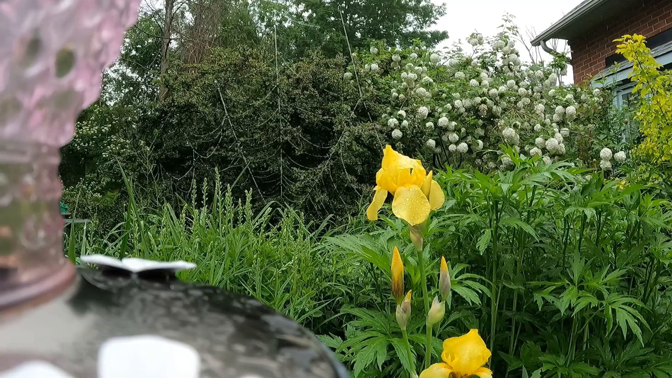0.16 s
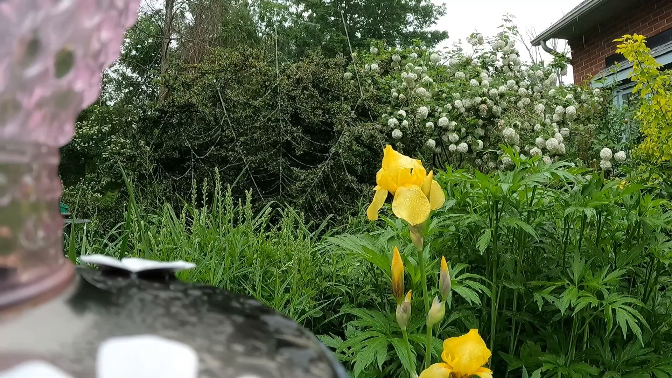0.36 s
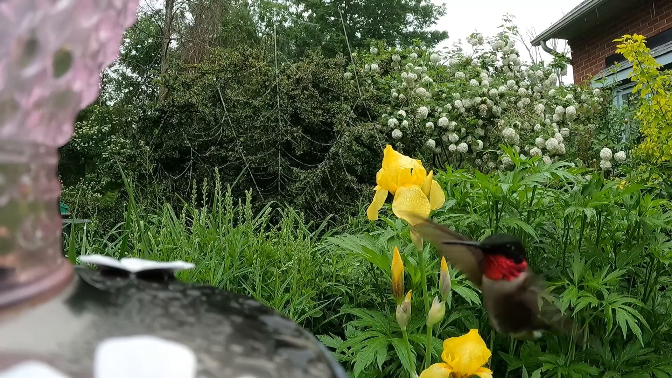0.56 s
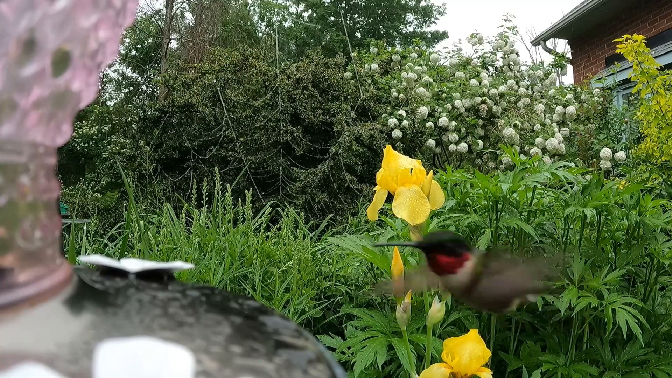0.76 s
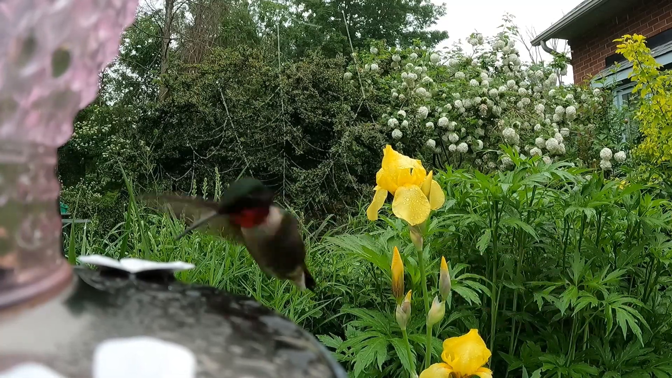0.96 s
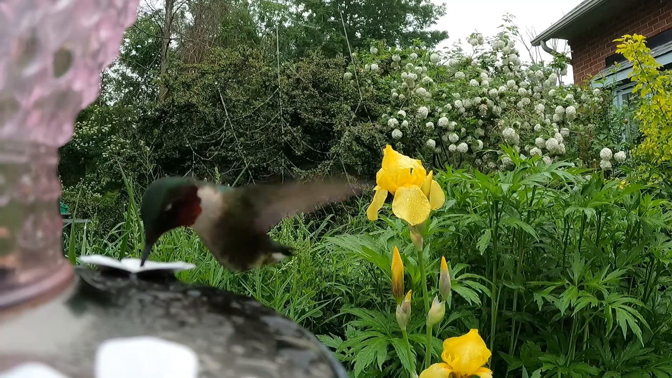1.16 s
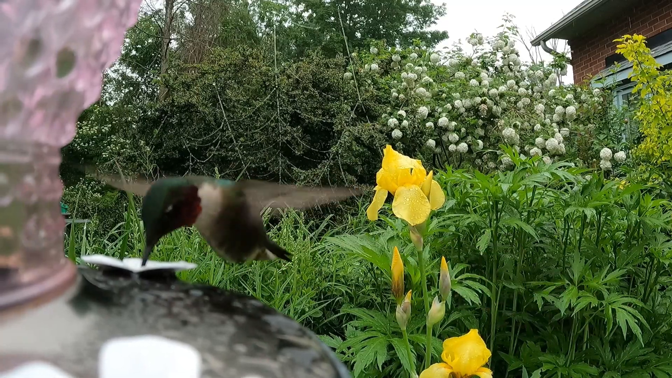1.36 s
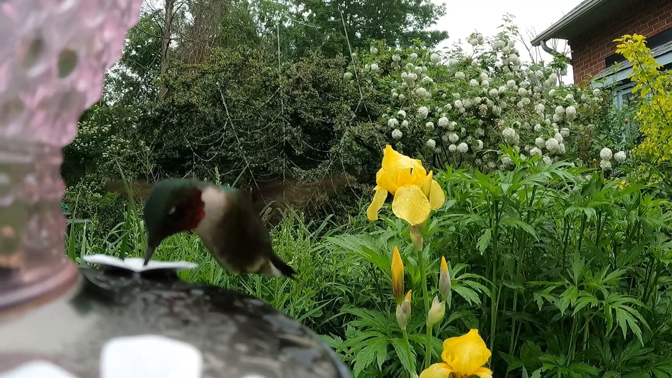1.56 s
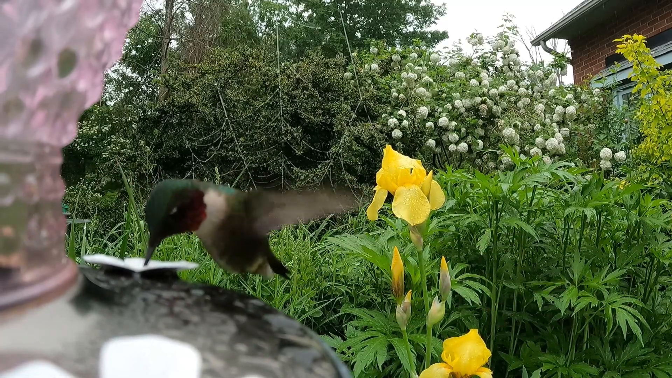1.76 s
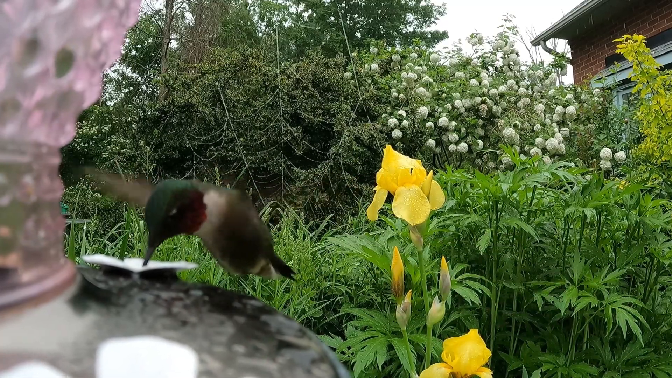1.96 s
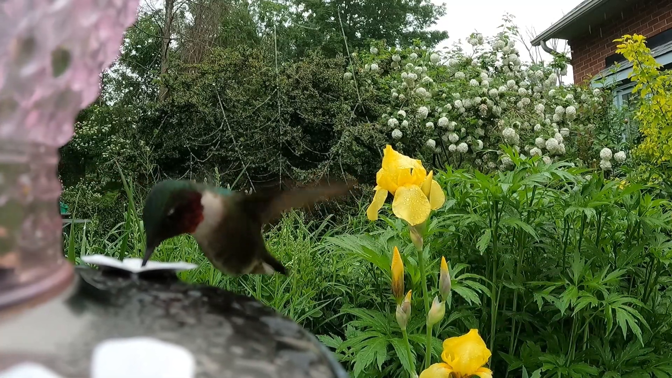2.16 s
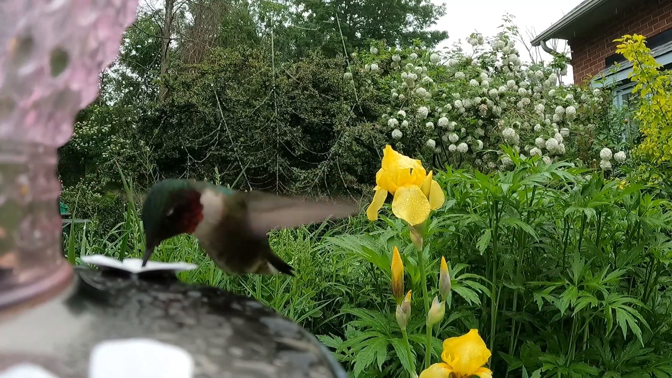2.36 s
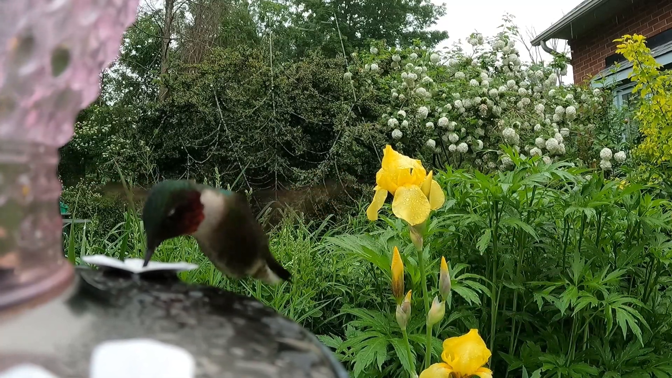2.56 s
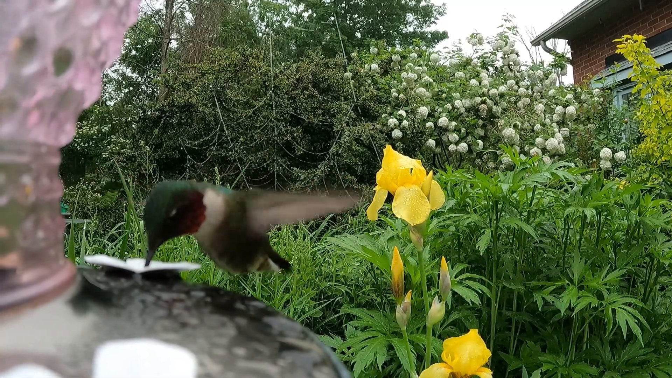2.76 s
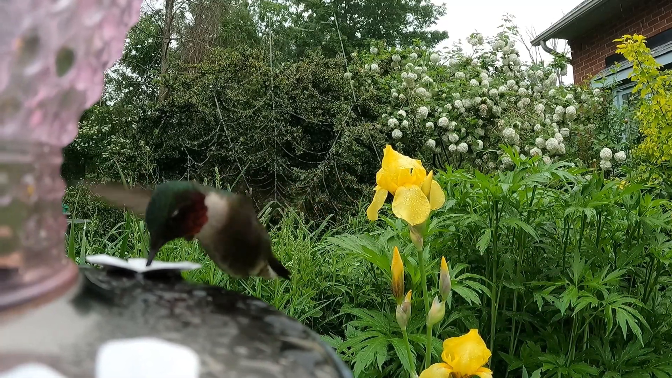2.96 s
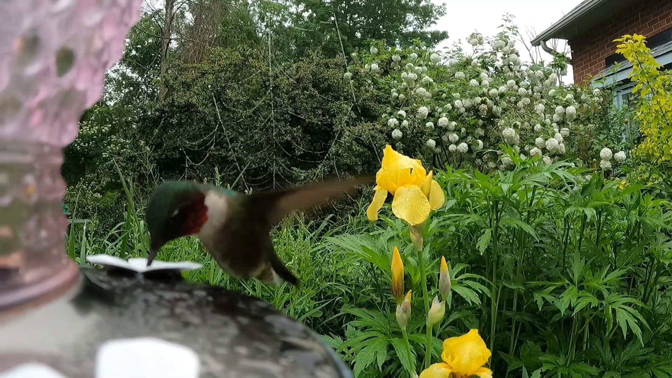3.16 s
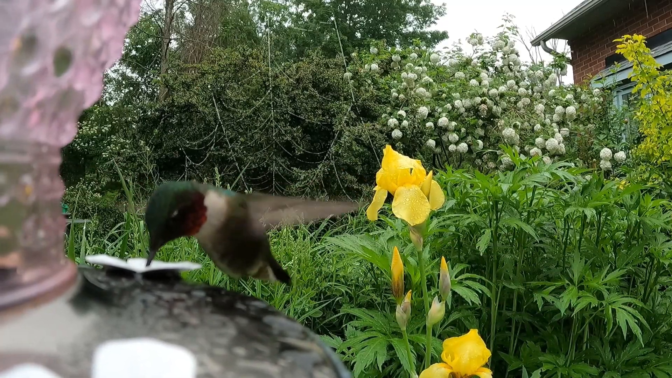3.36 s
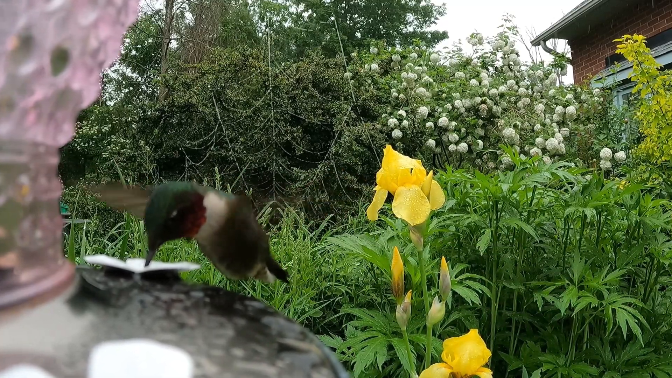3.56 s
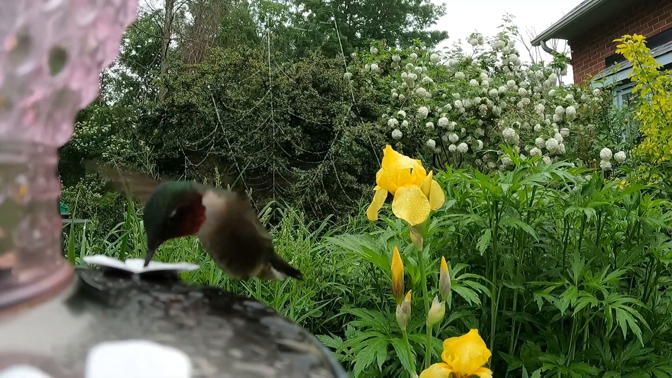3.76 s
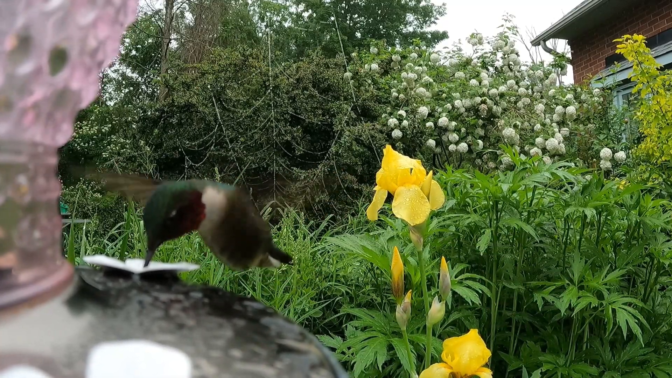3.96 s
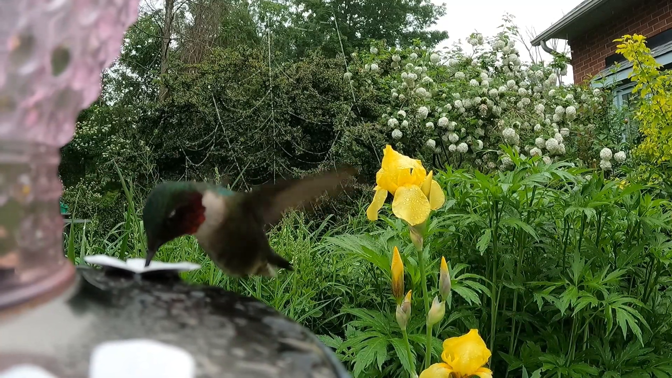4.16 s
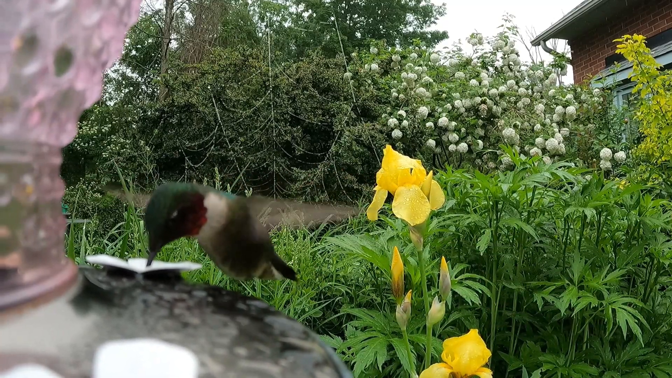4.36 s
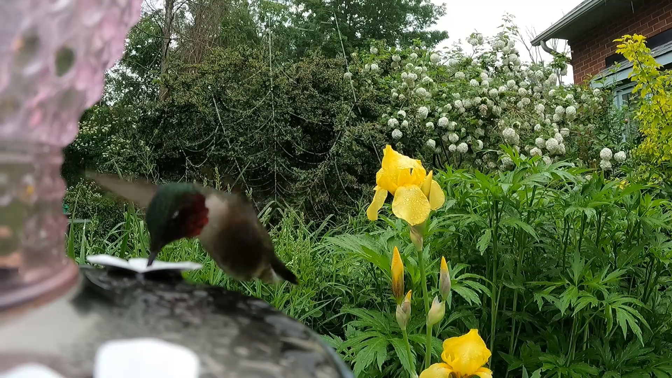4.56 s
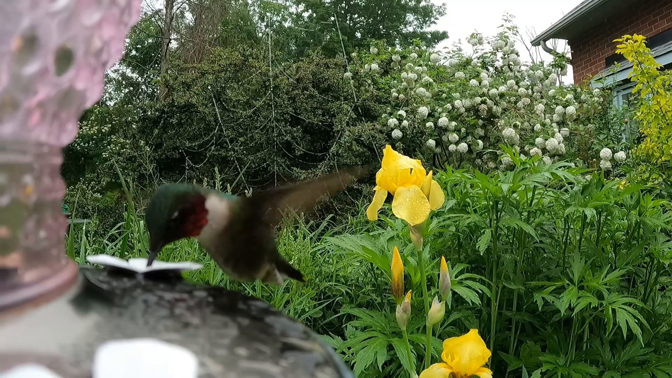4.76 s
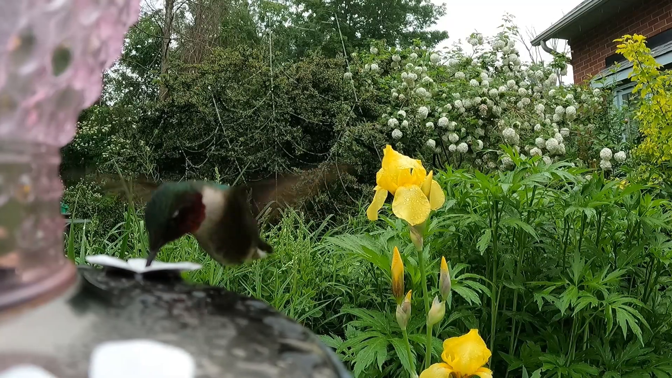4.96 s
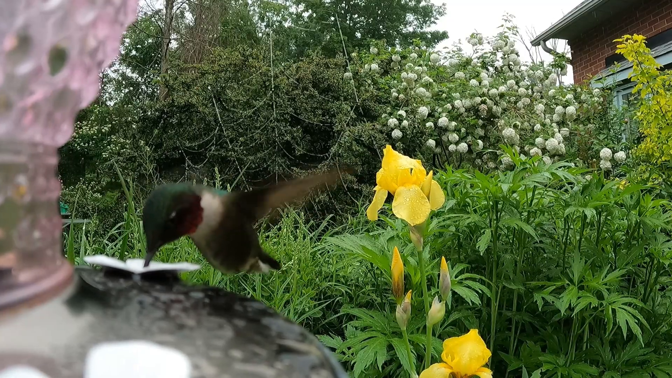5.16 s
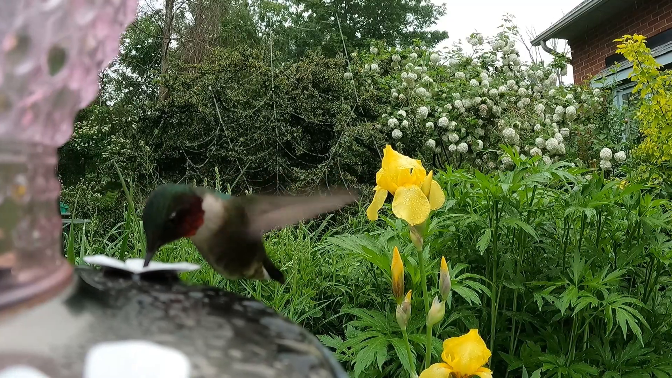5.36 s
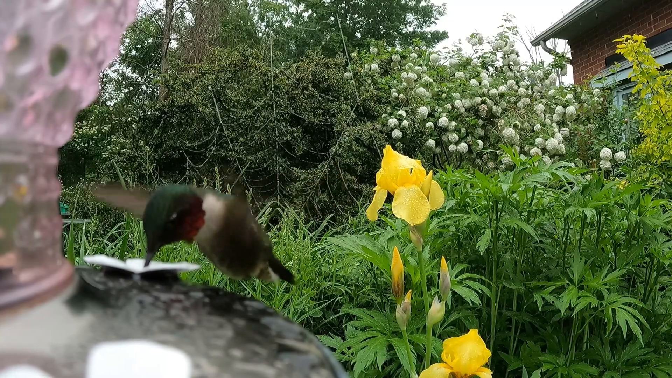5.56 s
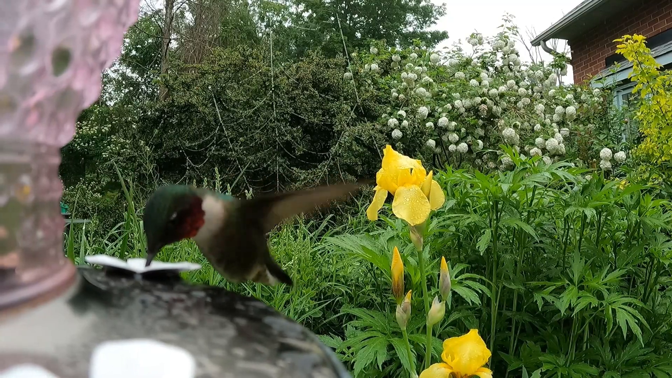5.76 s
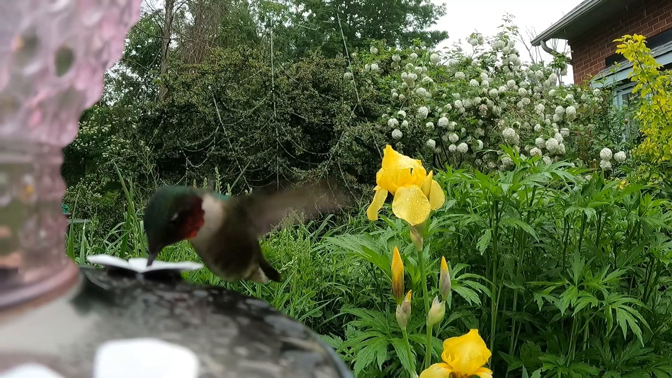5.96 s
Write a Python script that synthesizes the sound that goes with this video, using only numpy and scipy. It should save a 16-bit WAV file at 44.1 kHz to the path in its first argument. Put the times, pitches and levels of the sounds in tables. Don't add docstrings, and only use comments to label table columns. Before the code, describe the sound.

Close stereo pickup of hovering wings, slightly to the right. The first second is uneven: the hum swells, thins and brightens between gusty puffs and small clicks. Then the bird holds still and the deep, buzzing purr stays full and nearly constant, with slight surges in speed. A fine rustle and isolated crisp snaps ride on top; another bird chips briefly behind, over faint outdoor hiss.

```python
import sys
import numpy as np
from scipy import signal
from scipy.fft import rfft, irfft, next_fast_len
from scipy.io import wavfile
from scipy.ndimage import uniform_filter1d

SR = 44100
rng = np.random.default_rng(int(sys.argv[2]) if len(sys.argv) > 2 else 0)


def waveform_to_disk(signal):
    frames = np.transpose(np.atleast_2d(signal))
    scaled = np.clip(frames, -1, 1) * 32767
    samples = np.round(scaled).astype(np.int16)
    wavfile.write(sys.argv[1], SR, samples)


def how_loud(loudness_db):
    steps = np.asarray(loudness_db, float) / 20
    return 10 ** steps


N = 265482
T = np.arange(N) / SR
PAN_DB = -2.5

# start_s (middle of the puff), length_ms, extra_db
GUSTS = [
    (.40, 35, 8),
    (.55, 37, 13),
    (.655, 4.3, 19),
    (.86, 14, 16),
    (.90, 13, 4),
    (1.0, 22, 3),
    (1.07, 21, 10.5),
    (1.36, 14, 7.5),
    (2.62, 20, 7),
    (4.5, 33, 0),
]


def curve(table):
    s, *columns = np.transpose(table)
    return [np.interp(T, s, column) for column in columns]


def bumps(table):
    return sum(height * np.exp(-.5 * ((T - s) * 1000 / ms) ** 2) for s, ms, height in table)


def unit(x):
    return x / np.sqrt(np.mean(x ** 2))


def shape(x, gain):
    size = next_fast_len(N)
    hz = np.arange(size // 2 + 1) * SR / size + 1
    return irfft(rfft(x, size) * gain(hz), size)[..., :N]


def spectrum(table, column=1):
    rows = np.transpose(table)
    return lambda hz: np.interp(np.log(hz), np.log(rows[0]), rows[column])


def bell(centre_hz, width_hz):
    return lambda hz: 1 / np.sqrt(1 + ((hz - centre_hz ** 2 / hz) / width_hz) ** 2)


def walk(rate_hz):
    hold = int(SR / rate_hz)
    steps = np.repeat(rng.standard_normal(N // 200)[:N // hold + 1], hold)
    return unit(uniform_filter1d(uniform_filter1d(steps, hold), hold)[:N])


def sides(x, pan_db):
    return x * how_loud(np.array([pan_db / 2, -pan_db / 2]).reshape(2, -1))


def garden():
    # pitch_hz, level_db per Hz, likeness of the two sides (0-1)
    hiss = [(20.2, -25, .951), (43, -7.5, 0.8), (148, -5, 1), (393, -14.5, 0.74), (760, -23.6, 0.5),
            (1335, -18.5, 0.76), (2050, -24.5, 0.52), (2360, -26, 0.3), (4800, -28, 0.77),
            (7160, -37.5, 0.65), (9100, -40, 1), (11801, -39.5, 0.51), (14001, -57, .61)]

    def like(hz):
        return np.clip(spectrum(hiss, column=2)(hz), 0, 1)

    out, swell = 0, walk(0.36)
    for centre_hz in 30 * 2. ** np.arange(10):
        def part(hz):
            octave = np.clip(1 - abs(np.log2(hz / centre_hz)), 0, 1) ** .5
            return octave * how_loud(spectrum(hiss)(hz))

        mid = shape(rng.standard_normal(N), lambda hz: part(hz) * np.sqrt(1 + like(hz)))
        side = shape(rng.standard_normal(N), lambda hz: part(hz) * np.sqrt(1 - like(hz)))
        out = out + how_loud(0.65 * swell + 1.17 * walk(7)) * np.array([mid + side, mid - side])
    return unit(out) * how_loud(-47.5)


def chips():
    # start_s, length_s, level_db, top_hz, arch (share of the top pitch)
    calls = [
        (2.055, .015, -41, 4500, .16),
        (4.671, .014, -45, 4600, .22),
        (.296, .026, -56, 3100, .02),
        (.31, .04, -60, 2220, .03),
        (5.045, .045, -56, 2350, .04),
        (5.162, .015, -57, 2990, .01),
        (5.195, .028, -58, 2920, .01),
    ]
    out = np.zeros(N)
    for s, length_s, db, top_hz, arch in calls:
        u = np.arange(int(length_s * SR)) / (length_s * SR)
        hz = top_hz * (1 - arch * np.interp(u, [0, .25, .6, 1], [.6, 1, 0, 1.2]))
        turns = np.cumsum(uniform_filter1d(hz, 90)) / SR
        rattle = .3 * np.cos(2 * np.pi * 220 * u * length_s)
        breath = 1.6 * uniform_filter1d(rng.standard_normal(4000), 30)[:len(u)]
        hoarse = 1 + rattle + breath
        voices = np.sin(2 * np.pi * turns) + arch * np.sin(2 * np.pi * .78 * turns)
        i = int(s * SR)
        out[i:i + len(u)] += how_loud(db) * np.sin(np.pi * u) ** 0.7 * hoarse * voices
    echo = np.array([np.roll(out, 1100), np.roll(out, 1400)])
    return sides(out, -1.5) + how_loud(-15) * echo


def snaps():
    # start_s, peak level_db, pitch_hz, length_ms, pan_db (left minus right)
    clicks = [(.5515, -39, 4700, .25, -2), (.6138, -37, 5100, .3, -2), (.6443, -38, 5000, .3, -2),
              (.659, -40, 5800, .4, -2), (.865, -44, 6100, .8, -1), (1.2452, -38, 3600, .2, 0),
              (1.2922, -28, 4600, .16, 0), (2.7095, -42, 9000, .12, 0), (3.046, -37, 11000, .15, 0),
              (3.8555, -39, 10500, .12, 0), (4.0936, -40, 6500, .15, 0), (4.1983, -31, 3600, .12, 0),
              (4.2125, -42, 4800, .3, 0), (4.8752, -27, 7600, .16, 0), (5.2195, -35, 11800, .15, 0),
              (5.9263, -37, 8000, .3, 1)]
    out, t = np.zeros((2, N)), np.arange(-400, 400) / SR
    middle = len(t) // 2
    for s, db, hz, ms, pan_db in clicks:
        crackle = np.diff(rng.standard_normal(len(t) + 1))
        crackle[middle:middle + 4] += [5, 3, -6, -4]
        gate = np.exp(-np.where(t < 0, -1.6 * t, t) * 1000 / (1.3 * ms))
        click = how_loud(db) * gate * (np.cos(2 * np.pi * hz * t) + 0.15 * crackle)
        i = int(s * SR) - middle
        out[:, i:i + len(t)] += sides(click, pan_db)
    return out


def feathers(turns, hz, flick_db, slap_db):
    reversals = [
        (.54, .075, 9.5, 2, 5700, .16, .3, 0),
        (.55, .1, -1, 4, 11800, .06, .3, 0),
        (.09, .5, -4, 2.8, 3900, .2, .6, 0),
        (.52, .45, -3, 2.5, 1450, .12, .4, 1),
        (.08, 1.1, -7, 2.5, 1700, .15, .8, 1),
    ]
    facing = [(0, .82), (.7, .85), (1.1, .88), (1.4, 1), (3.5, 1.05), (4.6, 1.15), (6.02, 1.15)]
    brightness = curve(facing)[0]
    rustle = unit(shape(rng.standard_normal((2, N)), bell(7360, 6010)))
    out = how_loud(flick_db - 7) * rustle
    beat = np.floor(turns + .25).astype(int)
    for place, ms, db, scatter_db, centre_hz, spread, noisy, follows in reversals:
        early, size, pitch, lean = rng.standard_normal((600, 4))[beat].T
        off_s = (turns - beat - place + 0.0059 * early) / hz
        loud_db = (flick_db, slap_db)[int(round(follows))] + 14 + db
        loud_db = loud_db + scatter_db * np.clip(size, -3, 1.3)
        gate = np.exp(-.5 * (1000 * off_s * brightness ** 2 / ms) ** 2) * how_loud(loud_db)
        ring_hz = centre_hz * brightness * 2 ** (spread * pitch)
        ring = np.cos(2 * np.pi * ring_hz * off_s + 2 * lean)
        noise = shape(rng.standard_normal((2, N)), lambda f: bell(centre_hz, .8 * centre_hz)(f) ** 2)
        noise = unit(noise)
        flick = sides((1 - noisy) * ring + noisy * noise[0], 1.3 * lean + .4)
        width = 0.26 * noisy * noise[1] * np.array([[1], [-1]])
        out = out + gate * (flick + width)
    return out


def wake(loud_db):
    # pitch_hz, level_db per Hz
    thrown_air = [(30, -6), (100, -4), (250, -7.5), (450, -22.5), (800, -31.5), (1500, -46)]
    air = unit(shape(rng.standard_normal(N), lambda hz: how_loud(spectrum(thrown_air)(hz))))
    rush = unit(shape(rng.standard_normal(N), lambda hz: bell(420, 450)(hz) ** 2))
    gust = bumps([(s, ms, how_loud(db)) for s, ms, db in GUSTS])
    steady = air * how_loud(-18.0 + 2.0 * walk(13))
    return sides(how_loud(loud_db) * (steady + rush * gust * how_loud(-33.5)), PAN_DB)


def heard(near_db, degrees, settled):
    beams = [
        (1, -28.5, 1, -0.5),
        (-23, 5, 0.9, -1),
        (-10, -25.5, 0.56, 2),
        (-14.5, -11.5, -1, 3.5),
        (-5.5, -3.5, 1, -4),
        (-26.5, 0.5, 0.69, 1),
    ]
    angle = np.radians(np.clip(degrees, 0, 90))
    levels_db = []
    for face_db, side_db, sign, extra_db in beams:
        pressure = how_loud(face_db) * np.cos(angle) + sign * how_loud(side_db) * np.sin(angle)
        levels_db.append(near_db + extra_db * settled + 20 * np.log10(abs(pressure) + 0.0081))
    return levels_db


def hum(turns, levels_db):
    upper_overtones = [(5, -13), (6, -11.5), (7, -23.5), (8, -21), (9, -33), (10, -30.5), (11, -39.5),
                       (12, -37)]
    trough, edge = .375, .296
    rows = list(enumerate(levels_db[:4], 1))
    rows += [(k, levels_db[5 - int(k) % 2] + db) for k, db in upper_overtones]
    out, snap = 0, walk(25.075)
    for k, db in rows:
        waver = how_loud(min(0.16 * (k - 1), 2.5) * snap + min(0.078 * k, 1.5) * walk(21.83))
        if k == 1:
            lag = 0
        elif k < 6:
            lag = k * trough - .5
        else:
            lag = k * edge - .25
        wave = np.cos(2 * np.pi * (k * turns - lag + 0.0077 * k * walk(20)))
        out = out + sides(waver * how_loud(db + 2.5) * wave, PAN_DB - 0.57 * min(k - 1, 6))
    return out


def hummingbird():
    # start_s, wing-beat rate_hz
    beat_rate = [(0.0, 68.57), (0.1, 65.26), (0.24, 68.76), (0.35, 66.62), (0.45, 62.04), (0.55, 63.61),
                 (0.66, 65.39), (0.84, 66.83), (0.91, 63.35), (0.97, 67.28), (1.08, 72.5), (1.16, 69.33),
                 (1.2, 63.22), (1.47, 62.64), (6.02, 62.3)]
    # start_s, level_db
    nearness = [(0, -34.5), (.24, -36.5), (.35, -38), (.43, -33.5), (.48, -40.5), (.54, -34), (.6, -26.5),
                (.66, -24.5), (.75, -31.5), (.84, -27), (.91, -32.5), (.97, -27), (1.08, -26.5), (1.2, -24),
                (1.5, -24), (6.02, -24.5)]
    # start_s (middle), length_ms, angle_degrees
    swings = [(.12, 31, 4.9), (.27, 25, 4.5), (.385, 28, 63), (.432, 19, 66), (.49, 28, 72), (.54, 12, 37),
              (.665, 12, 5.4), (.755, 25, 18), (.885, 20.5, 62), (.96, 18, 5.8), (1.02, 15, 6.7),
              (1.24, 29, 5.9)]
    # start_s (middle), length_ms, faster by rate_hz
    surges = [(1.279, 105, 2.28), (1.689, 140, 0.44), (2.362, 140, 0.8), (2.995, 30, 0.76),
              (3.221, 126, 0.9), (3.667, 76, 1.2), (3.928, 117, 3.38), (4.298, 47, 1.11),
              (4.591, 140, 1.51), (4.938, 72, 2.73), (5.171, 140, 2.16), (5.669, 139, 0.96),
              (6.041, 140, 1.63)]
    (hz,), (near_db,) = curve(beat_rate), curve(nearness)
    effort, swing_deg = bumps(surges), bumps(swings)
    hz, near_db = hz + effort, near_db + 0.52 * effort
    settled = .5 + .5 * np.tanh((T - 1.134) * 1000 / 15)
    hover_deg = 10.3 + 0.5 * effort + 1.8 * walk(12)
    levels_db = heard(near_db, swing_deg + settled * hover_deg, settled)
    turns = .227 + np.cumsum(hz) / SR + 0.0078 * walk(25)
    far_db = np.minimum(near_db + 27.5, 0)
    flick_db = -60.1 + far_db + 0.081 * swing_deg + 0.45 * T
    gust_db = uniform_filter1d(bumps(GUSTS), size=2000)
    slap_db = -62 + .5 * far_db + 0.68 * gust_db + 1.4 * effort
    loud_db = np.maximum(levels_db[0], levels_db[1])
    return hum(turns, levels_db) + wake(loud_db) + feathers(turns, hz, flick_db, slap_db)


def scene():
    return garden() + chips() + snaps() + hummingbird()


def low_pass(x):
    return signal.sosfilt(signal.butter(12, 15000, fs=SR, output="sos"), x)


def record(dry):
    # pitch_hz, width_hz, level_db
    case_dip = (10291, 1280, -8.5)
    dip_hz, width_hz, dip_db = case_dip

    def camera(hz):
        notch_db = dip_db * np.exp(-((hz - dip_hz) / width_hz) ** 2)
        shelf_db = -4.6 * np.clip((hz - 9000) / 1500, 0, 1)
        roll_db = -11 * np.maximum(hz - 11500, 0) / 1500
        return how_loud(notch_db + shelf_db + roll_db)

    return low_pass(shape(dry, camera))


dry = scene()
out = record(dry)
waveform_to_disk(out)
```